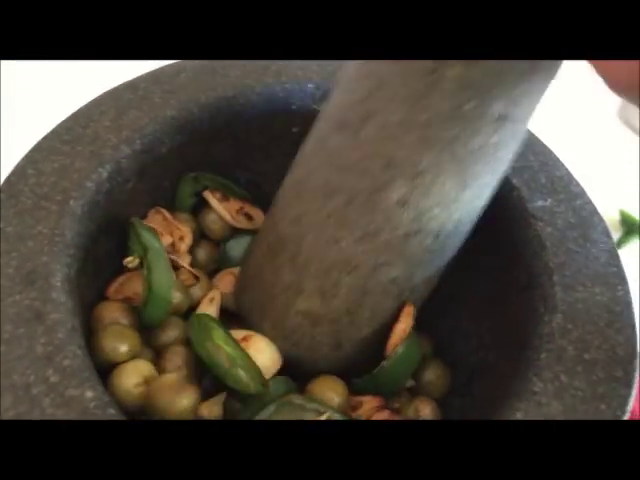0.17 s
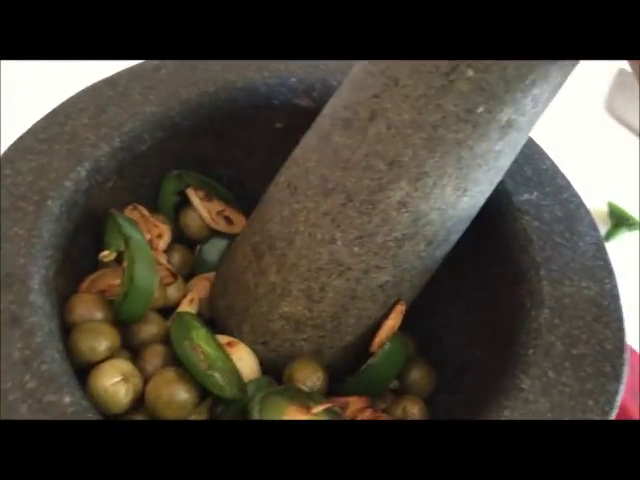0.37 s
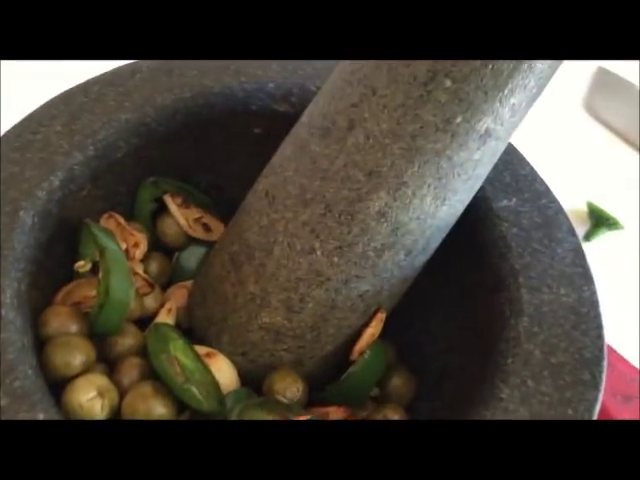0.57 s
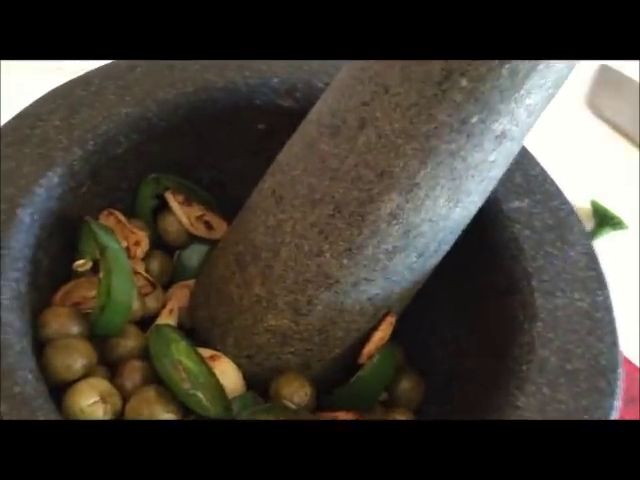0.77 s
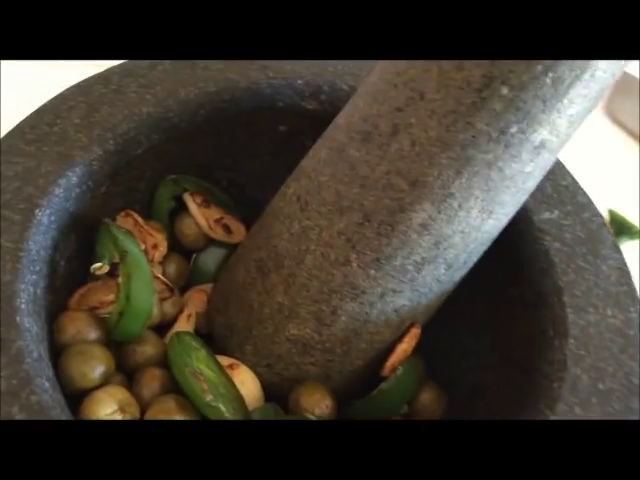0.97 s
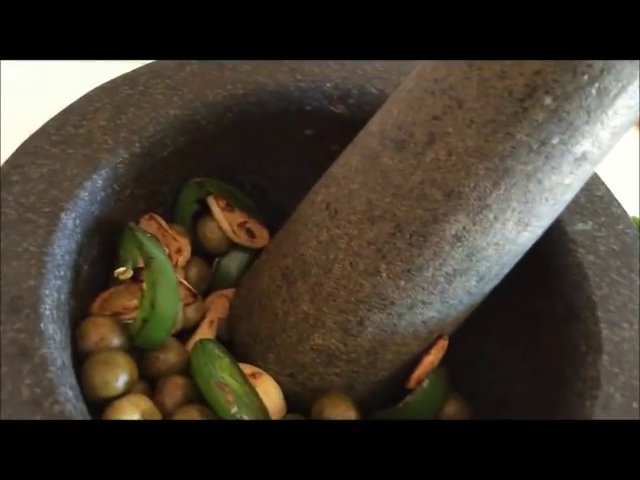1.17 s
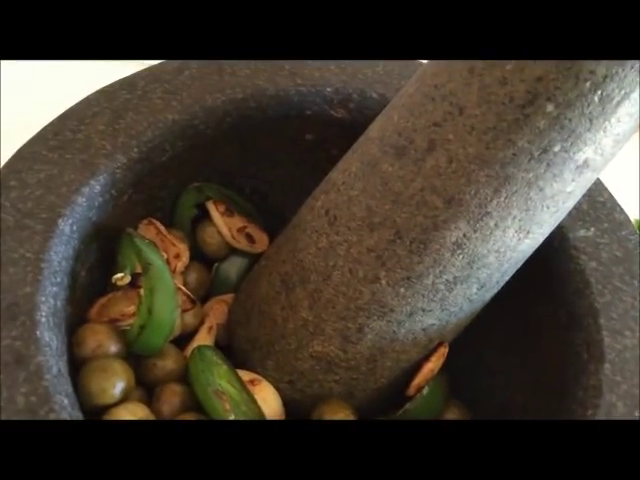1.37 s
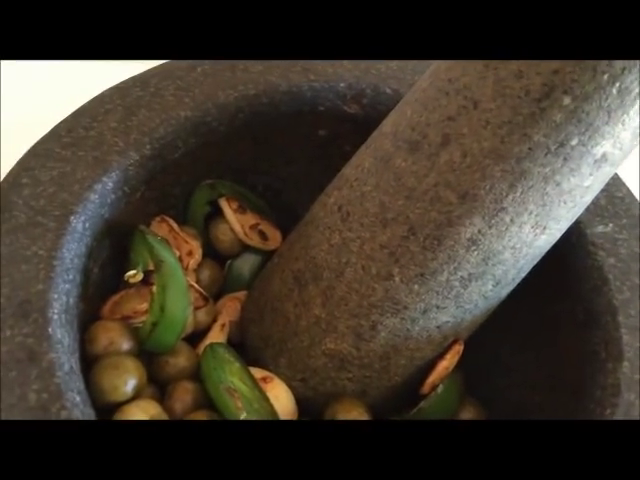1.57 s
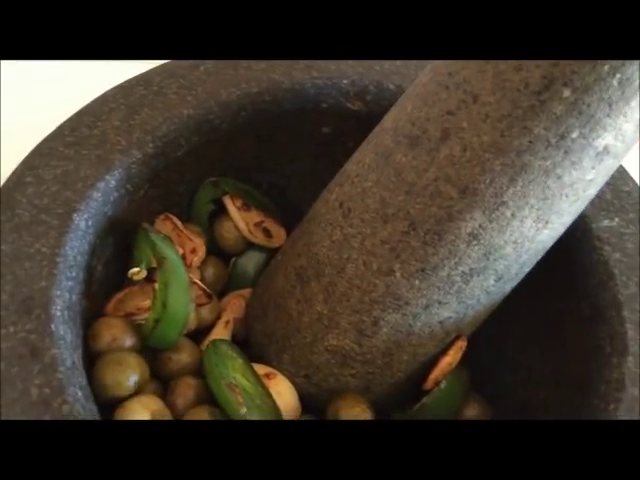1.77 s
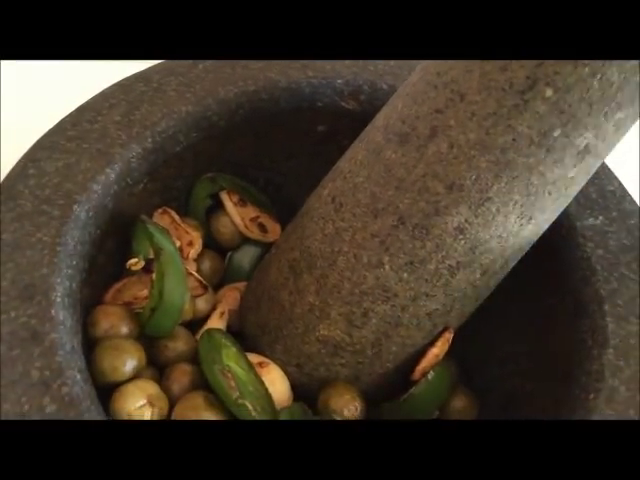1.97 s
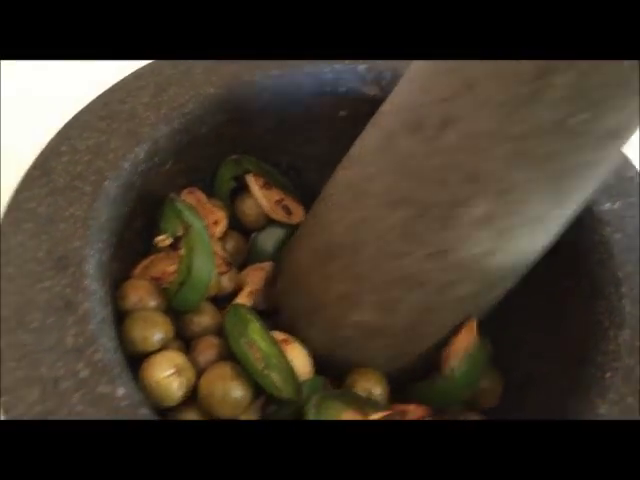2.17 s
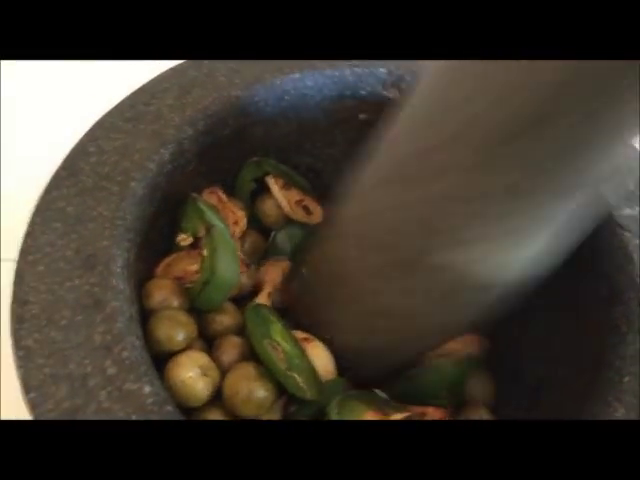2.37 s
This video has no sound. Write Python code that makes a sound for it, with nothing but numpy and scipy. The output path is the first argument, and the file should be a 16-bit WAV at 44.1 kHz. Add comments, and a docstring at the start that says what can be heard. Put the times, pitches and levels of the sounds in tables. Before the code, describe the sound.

A stone pestle strikes vegetables in a stone mortar with a loud crunching crack, then a duller knock that bounces quickly; after a quiet pause with low hum, it rustles and ticks. Close microphone, hard-walled kitchen.

```python
"""A hard-walled kitchen: a stone pestle comes down on chillies, garlic and small green berries in a stone mortar.
It crushes through them with a sharp crack, drops again with a duller knock and bounces; the counter thumps.
After a pause it is dragged up through the vegetables, which rustle and tick. An appliance hums low.
Filtered clicks ring the stone's modes; shaped random grains make crunch, rustle and a harsh overload edge;
noise makes room and air."""
import sys
import numpy as np
from scipy import signal
from scipy.fft import rfft, irfft
from scipy.io import wavfile
from scipy.ndimage import uniform_filter1d, minimum_filter1d

SR = 44100
rng = np.random.default_rng(int(sys.argv[2]) if len(sys.argv) > 2 else 0)


def materialize(psi):
    """Save the field psi as 16-bit PCM at rate SR to the path in sys.argv[1].

    A 1-D psi becomes a single channel; in a 2-D psi each row is a channel.
    """
    bounded = np.clip(np.atleast_2d(psi).T, -1, 1)
    quanta = np.round(bounded * 32767).astype(np.int16)
    wavfile.write(sys.argv[1], SR, quanta)


N = 105840
TIME = np.arange(N) / SR  # seconds


def blows():
    """The pestle strikes and bounces; seeds and skins snap. Each contact is a click pushing on the bowl."""
    # Stone meeting stone. Each row: start in seconds, strength in dB, top of the contact's spectrum in Hz,
    # share that excites the ringing in dB, share that excites the dull body in dB.
    contacts = [(0.2243, 10, 12500, -5, -12), (0.2248, 15.5, 6500, -5, -6), (0.3917, 7, 2100, 9, -25),
                (0.4082, 17, 1680, -13, -19), (0.4184, 13.5, 1650, -17, -13),
                (0.4253, 14.5, 1590, -13, -16), (0.4290, 9, 1000, -13.5, -10), (0.4326, 6, 890, -12.5, -6)]
    # Seeds and skins snapping. Each row: start in seconds, strength in dB, top of the spectrum in Hz.
    snaps = [(.0035, -22, 8000), (.012, -31, 8000), (.020, -23, 6960), (.054, -31, 2200),
             (.0665, -40, 15000), (.175, -42, 7000), (.192, -32, 2600), (.2012, -16, 7500),
             (0.212, -16, 9000), (2.231, -24, 3770), (1.66, -48, 15000), (2.272, -27, 5040),
             (2.2795, -35, 7950), (2.2935, -26, 4190), (2.3187, -37.5, 3000), (2.323, -16, 2600),
             (2.331, -26, 5500), (2.3565, -39, 12000)]
    snap_ring_db = -8.5
    pushes = np.array([contact(*row[:3]) for row in contacts])
    shares = from_db(np.array(contacts)[:, 3:])
    ringing, heavy = shares.T @ pushes
    ticks = sum(contact(*row) for row in snaps)
    return mortar(pushes.sum(axis=0) + ticks, ringing + from_db(snap_ring_db) * ticks, heavy)


def contact(start_s, db, top_hz):
    """A push on the stone: the softer the contact, the lower the top of its spectrum."""
    click = np.arange(N) == int(start_s * SR)
    return butter(from_db(db) * click, top_hz, "low", order=6)


def mortar(push, ringing, heavy):
    """The dead knock of the heavy bowl, its dull body, and its modes as decaying sines."""
    # Modes of mortar and pestle. Each row: frequency in Hz, level in dB, 60 dB decay time in seconds.
    stone_modes = [(1045, -38, .05), (1160, -42, .05), (1640, -39, .04), (1730, -37.5, .05),
                   (1872, -17, .016), (2145, -34, .035), (3000, -35, .035), (3520, -41, .05),
                   (3900, -33, .025), (4170, -35.5, .04), (5300, -39, .03), (5875, -26, .022),
                   (6740, -31, .03), (7830, -34, .03)]
    knock = butter(push, 950, "high", order=3)  # the knock is weak below this
    body = butter(heavy, [280, 440], "band", order=2)
    modes = sum(from_db(db) * ring(ringing, hz, t60_s) for hz, db, t60_s in stone_modes)
    return knock + body + butter(modes, 780, "high", order=3)  # the modes radiate little below this


def ring(x, hz, t60_s):
    """A resonator: a unit click sets a decaying sinusoid of height 1 ringing."""
    radius, angle = from_db(-60 / (t60_s * SR)), 2 * np.pi * hz / SR
    feedforward = [1, -radius * np.cos(angle)]
    feedback = [1, -2 * radius * np.cos(angle), radius * radius]
    return signal.lfilter(feedforward, feedback, x + 1e-18)


def crush():
    """Skins squeak and crackle under growing pressure, crack open and crumble: enveloped grains and a tone."""
    # Spectrum of the crunch. Each row: frequency in Hz, relative level in dB.
    crunch_spectrum = [(150, -26), (350, -14), (600, -15), (1050, -5), (1350, -9), (1800, 0), (2500, -3),
                       (4000, -3), (5000, -6), (6300, -3), (8500, -10), (10500, -20), (15000, -20)]
    burst_s, squeeze_s = .2241, .017
    crunch_db, crunch_rise_db_per_s, crunch_fall_db_per_s = -20, 1300, 540
    squeeze_db = -7  # the squeeze relative to the crunch
    crack_db, crack_fall_db_per_s = -14, 2200
    squeak_hz, squeak_width_hz, squeak_db, squeak_rise_db_per_s = 2980, 400, -20, 1200

    before, after = np.maximum(burst_s - TIME, 0), np.maximum(TIME - burst_s, 0)
    squeezing = (before > 0) & (before < squeeze_s)
    burst = before == 0
    build_up = squeezing * from_db(squeeze_db - crunch_rise_db_per_s * before)
    crumble = burst * from_db(-crunch_fall_db_per_s * after)
    crunch = from_db(crunch_db) * (build_up + crumble)
    crack = burst * from_db(crack_db - crack_fall_db_per_s * after)
    squeak_level = squeezing * from_db(squeak_db - squeak_rise_db_per_s * before)
    squeak = squeak_level * narrow_noise(squeak_hz, squeak_width_hz)
    return (crunch + crack) * coloured(grains(per_s=9800, spread_db=3.0), crunch_spectrum) + squeak


def overload_buzz():
    """A very short bright burst of grains at each landing, like the harsh edge of an overload."""
    # Bursts. Each row: start in seconds, level in dB.
    bursts = [(.3922, -18), (.4085, -50), (.4256, -54)]
    # Spectrum of the buzz. Each row: frequency in Hz, relative level in dB.
    buzz_spectrum = [(400, -22), (3600, -16), (4500, -1), (5350, 3.5), (6300, -11), (8600, -13), (9450, -8),
                     (10500, -19), (15000, -24)]
    fall_db_per_s = 9000
    level = sum((TIME > s) * from_db(db - fall_db_per_s * np.abs(TIME - s)) for s, db in bursts)
    return level * coloured(grains(per_s=9800, spread_db=2.0), buzz_spectrum)


def rustle():
    """Fine dense grains as the moving pestle rubs past the vegetables."""
    # Loudness of the sliding. Each row: time in seconds, level in dB.
    slide = [(0, -49), (.022, -57), (.04, -61.5), (.125, -66), (.15, -73), (.19, -62), (.22, -51),
             (.3, -100), (2.14, -100), (2.18, -63.5), (2.2, -56), (2.217, -51.5), (2.238, -51.5),
             (2.252, -63.5), (2.28, -55.5), (2.325, -52), (2.355, -59.5), (2.372, -66), (2.4, -85)]
    # Spectrum of the rustle. Each row: frequency in Hz, relative level in dB.
    rustle_spectrum = [(300, -16), (700, -17), (1200, -4), (1900, 3), (3000, 2), (4400, -5.5), (6300, 1),
                       (9500, -3), (12500, 0), (15000, -2)]
    level = from_db(np.interp(TIME, *np.transpose(slide)))
    return level * coloured(grains(per_s=20000, spread_db=2.2), rustle_spectrum)


def counter():
    """The counter gives under the mortar: a few low swings per thump, and a weak boom that lingers."""
    # Thumps. Each row: start in seconds, peak of the swings in dB, frequency in Hz, length of the swings in seconds.
    thumps = [(.236, -31.5, 93.3, .036), (.398, -34.5, 114, .064), (1.33, -53, 112, .036)]
    boom_db, boom_t60_s = -15, .35  # the boom relative to its thump
    out = 0
    for start_s, db, hz, length_s in thumps:
        age = np.maximum(TIME - start_s, 0)
        phase = np.minimum(age / length_s, 1)
        swings = np.sin(np.pi * phase) ** 2 * np.sin(2 * np.pi * hz * age)
        boom = from_db(boom_db - 60 * age / boom_t60_s) * phase * narrow_noise(hz, width_hz=44)
        out = out + from_db(db) * (swings + boom)
    return out


def bumps():
    """Soft low swells of noise: handling bumps, and the counter's low ring lingering after the second blow."""
    # Swells. Each row: centre in seconds, level in dB, length in seconds.
    swells = [(.005, -53, .08), (0.099, -59.5, 0.058), (0.334, -57, .07), (.49, -59, .14), (.7, -64, .1),
              (.8, -62.5, .04), (.92, -59, 0.086), (2.25, -60, .09)]
    # Spectrum of a swell. Each row: frequency in Hz, relative level in dB.
    swell_spectrum = [(22, -20), (45, 0), (105, 0.5), (170, -9), (300, -20), (800, -45.5)]
    level = sum(from_db(db) * np.exp(-(2 * (TIME - s) / length_s) ** 2) for s, db, length_s in swells)
    return level * coloured(rng.standard_normal(N), swell_spectrum)


def kitchen(x):
    """Quick reflections off counter and nearby walls, then a diffuse noise tail that dies band by band."""
    # Reverberation. Each row: frequency in Hz, relative level in dB, 60 dB decay time in seconds.
    tail = [(150, -36, .45), (320, -32, .5), (560, -23, .6), (800, -22, .7), (1100, -16.5, .85),
            (1850, -17, .98), (2800, -16.5, .76), (6000, -15.5, .67), (8500, -17.5, .58), (11000, -23, .5),
            (14000, -26, .46)]
    near_db, near_t60_s, delay_s = -16, .11, .005
    hz, db, t60 = np.transpose(tail)
    white, edges = rng.standard_normal((3, N)), np.geomspace(100, 17000, 15)

    def dying(level_db, t60_s):
        unit_energy = np.sqrt(2 * np.log(1000) / (t60_s * SR))
        return from_db(level_db - 60 * TIME / t60_s) * unit_energy

    response = white[2] * dying(near_db, near_t60_s)
    for k, band in enumerate(zip(edges, edges[1:])):
        centre = np.log(band).mean()
        level_db, t60_s = (np.interp(centre, np.log(hz), column) for column in (db, t60))
        # neighbouring bands take different noise
        response = response + butter(white[k % 2], band, "band") * dying(level_db, t60_s)
    return signal.fftconvolve(x, response * (TIME > delay_s))[:N]


def background():
    """Room air as coloured noise, and the hum of an appliance as wavering tones."""
    # Spectrum of the air. Each row: frequency in Hz, relative level in dB per Hz.
    air_spectrum = [(22, -32), (40, -7), (90, -0.5), (200, 0), (400, -5.5), (520, -10), (900, -13),
                    (1700, -12), (4000, -18.5), (8000, -23.5), (15000, -26)]
    # Appliance hum. Each row: frequency in Hz, width in Hz, level in dB.
    hum_tones = [(112, 30, -70.5), (301.3, 30, -70.5), (376.6, 14, -74), (609, 46, -82), (3670, 25, -90)]
    air = from_db(-67) * coloured(rng.standard_normal(N), air_spectrum)
    hum = sum(from_db(db) * narrow_noise(hz, width_hz) for hz, width_hz, db in hum_tones)
    return air + hum


def from_db(db):
    """Decibels to amplitude."""
    return 10 ** (np.asarray(db) / 20)


def rms_one(x):
    """Scale to an rms of 1."""
    return x / np.sqrt(np.mean(x ** 2) + 1e-20)


def butter(x, hz, kind, order=2):
    """Causal low-, high- or band-pass."""
    sos = signal.butter(order, np.clip(hz, 10, .45 * SR), kind, fs=SR, output="sos")
    return signal.sosfilt(sos, x + 1e-18)


def coloured(x, spectrum):
    """Give a steady texture a spectrum of (Hz, dB) points; rms 1."""
    hz, db = np.transpose(spectrum)
    bins = np.log(np.fft.rfftfreq(N, 1 / SR) + 1)
    return rms_one(irfft(rfft(x) * from_db(np.interp(bins, np.log(hz), db)), N))


def narrow_noise(hz, width_hz):
    """A wavering tone made of band-passed noise; rms 1."""
    noise = rng.standard_normal(N + SR)  # the first second lets the filter settle
    return rms_one(butter(noise, [hz - width_hz / 2, hz + width_hz / 2], "band")[SR:])


def grains(per_s, spread_db):
    """Random clicks of uneven size and either sign."""
    happens = rng.random(N) < per_s / SR
    size = from_db(spread_db * np.minimum(rng.exponential(1, N), 4))
    return happens * rng.choice([-1, 1], N) * size


def limit(x):
    """The gain ducks just ahead of each peak above the limit and springs back."""
    ceiling, release_db_per_s = 1.25, 2500
    over_db = np.maximum(20 * np.log10(np.abs(x) / ceiling + 1e-9), 0)
    release = release_db_per_s * TIME
    duck_db = np.maximum.accumulate(over_db + release) - release
    gain_db = uniform_filter1d(minimum_filter1d(-duck_db, size=65), size=65)
    return x * from_db(gain_db)


def suppress(x):
    """Noise suppression: everything above the bass is turned down whenever it is faint."""
    split_hz, threshold_db, slope_db_per_db, depth_db = 870, -55, .55, 5.5
    bass = signal.sosfiltfilt(signal.butter(2, split_hz, fs=SR, output="sos"), x)
    treble = x - bass
    level_db = 10 * np.log10(np.abs(uniform_filter1d(treble ** 2, size=1024)) + 1e-14)
    gain_db = np.clip(slope_db_per_db * (level_db - threshold_db), -depth_db, 0)
    return bass + treble * from_db(gain_db)


def scene():
    """The mortar close up; stone and pulp each send their own sound into the kitchen."""
    stone, pulp = blows() + overload_buzz(), rustle()
    # the crush has separate random grains in the room and up close
    room = from_db(-2) * kitchen(stone) + from_db(2) * kitchen(crush() + pulp)
    return (stone + pulp + crush() + room + counter() + bumps() + background())[None]


def record(dry):
    """The loudest peaks are limited and rounded, faint treble is suppressed, the top is cut."""
    overload, hardness, cutoff_hz = .56, 5.0, 15300
    held = limit(dry[0])[None]
    rounded = held / (1 + np.abs(held / overload) ** hardness) ** (1 / hardness)
    top_cut = signal.ellip(10, .05, 60, cutoff_hz, fs=SR, output="sos")
    return signal.sosfiltfilt(top_cut, suppress(rounded))


dry = scene()
out = record(dry)
materialize(out)
```